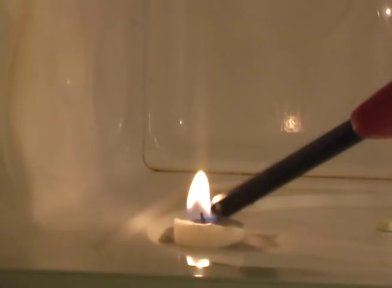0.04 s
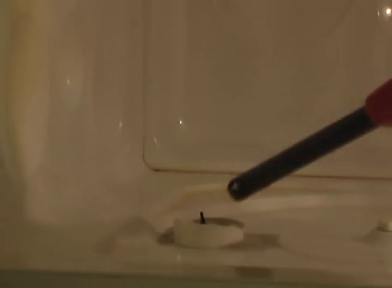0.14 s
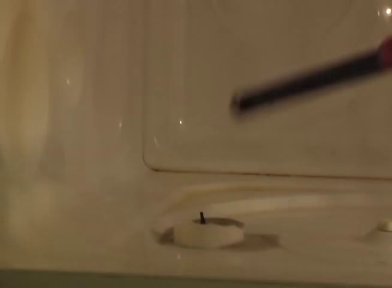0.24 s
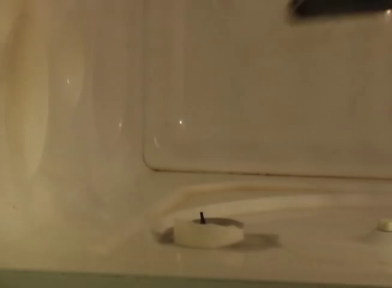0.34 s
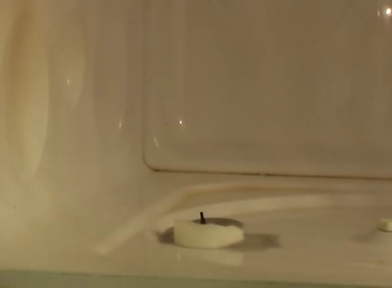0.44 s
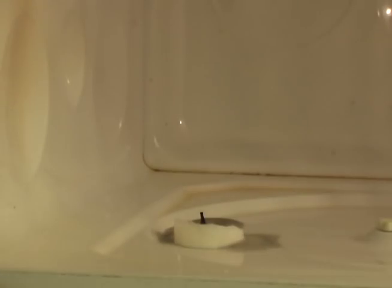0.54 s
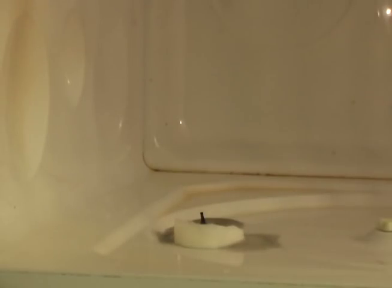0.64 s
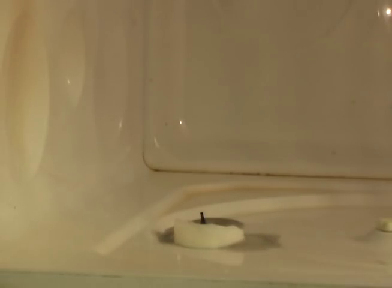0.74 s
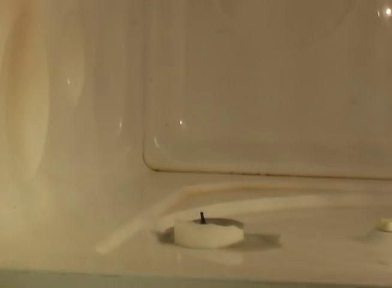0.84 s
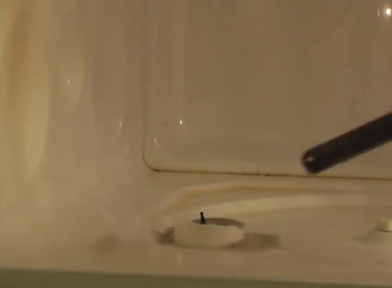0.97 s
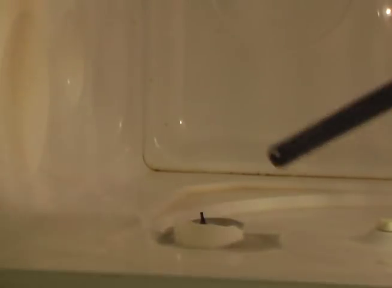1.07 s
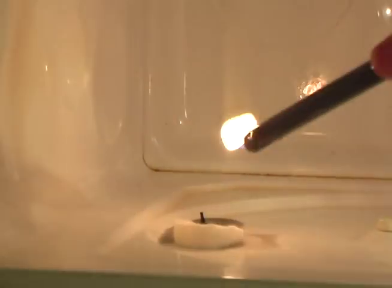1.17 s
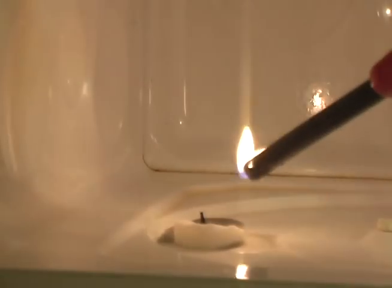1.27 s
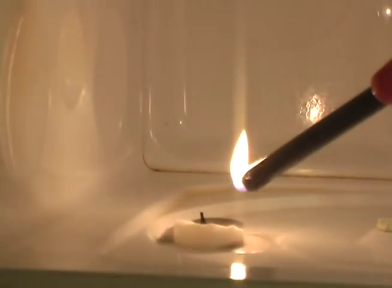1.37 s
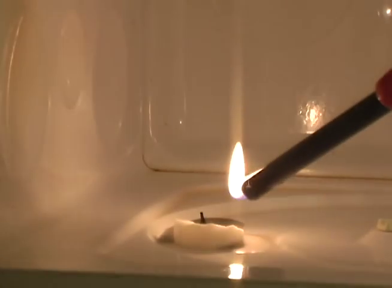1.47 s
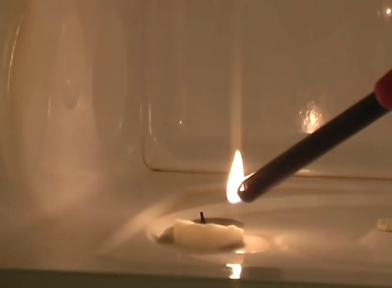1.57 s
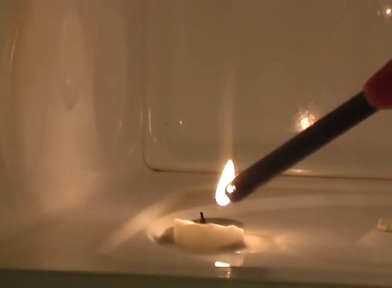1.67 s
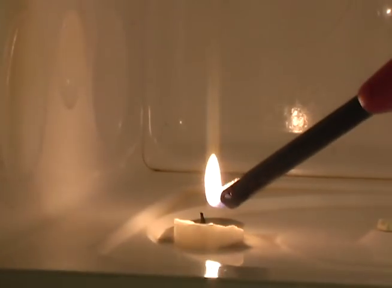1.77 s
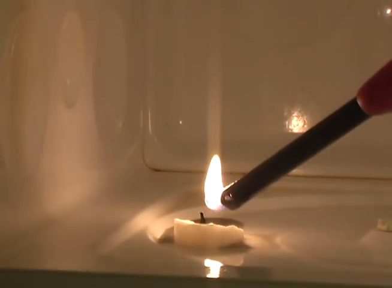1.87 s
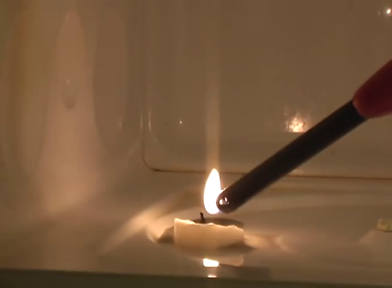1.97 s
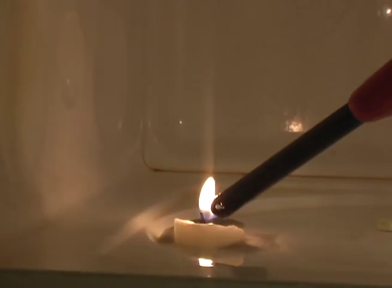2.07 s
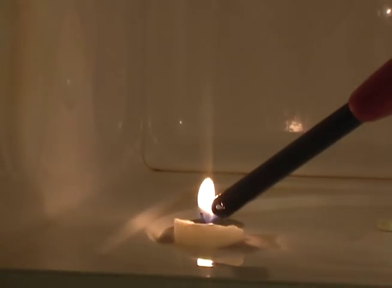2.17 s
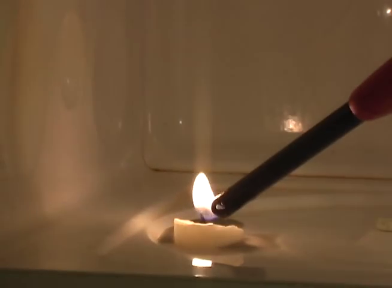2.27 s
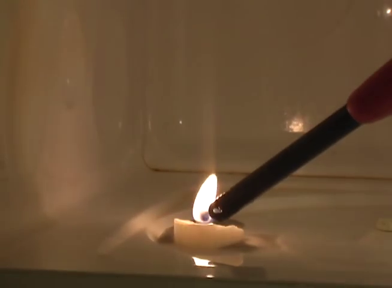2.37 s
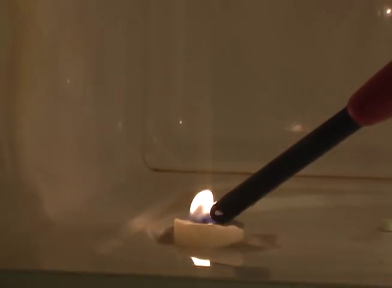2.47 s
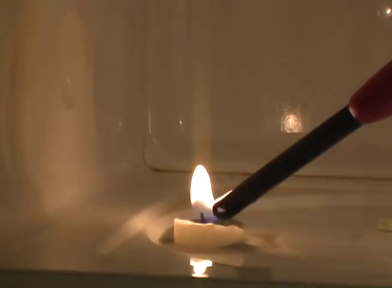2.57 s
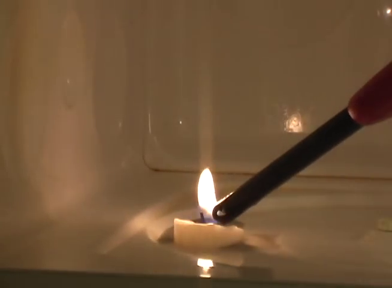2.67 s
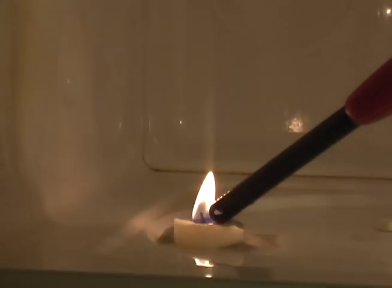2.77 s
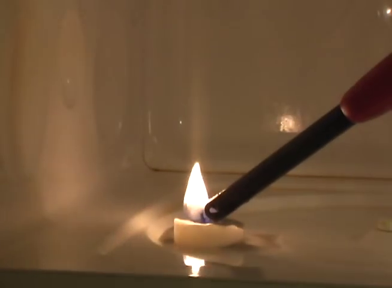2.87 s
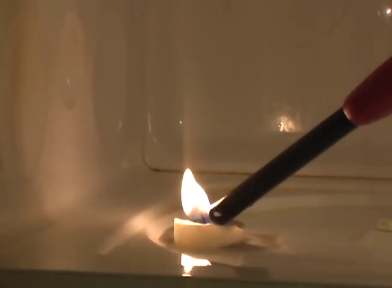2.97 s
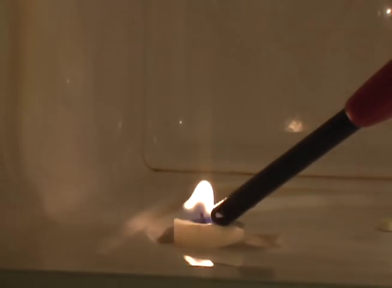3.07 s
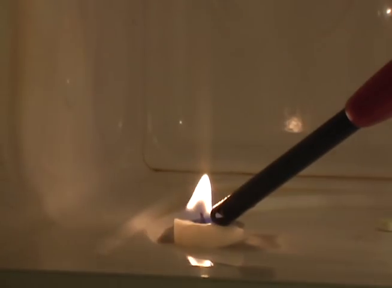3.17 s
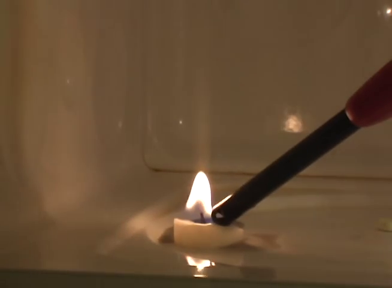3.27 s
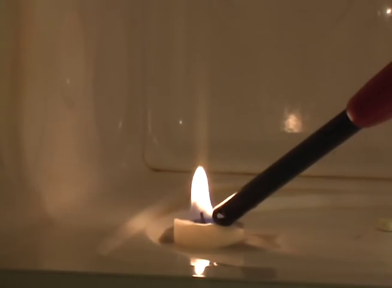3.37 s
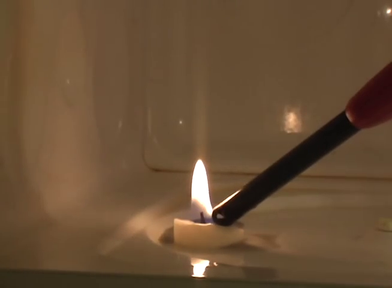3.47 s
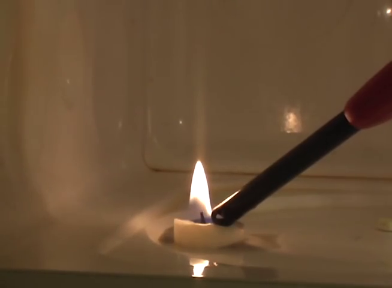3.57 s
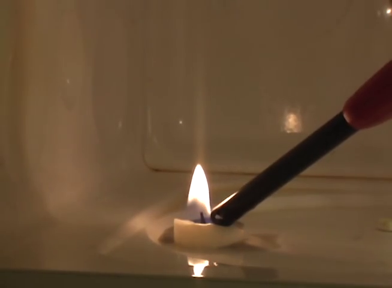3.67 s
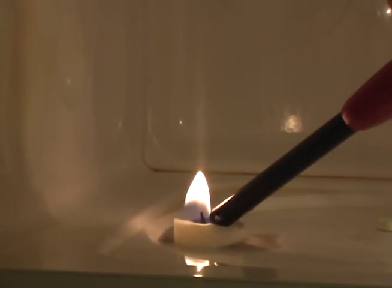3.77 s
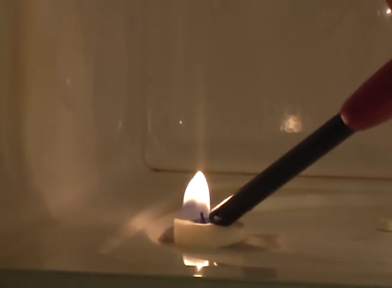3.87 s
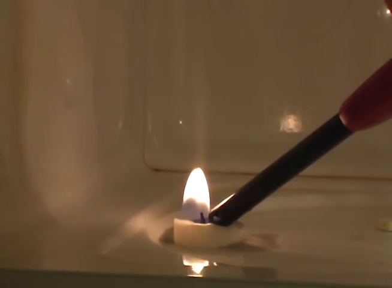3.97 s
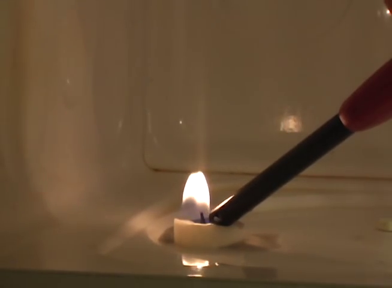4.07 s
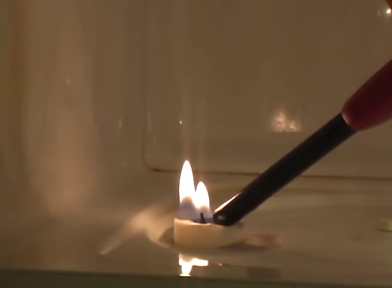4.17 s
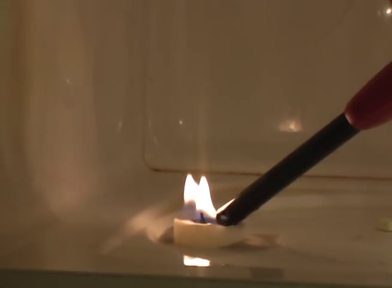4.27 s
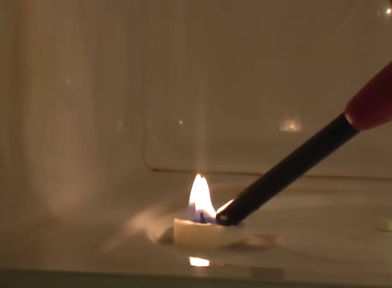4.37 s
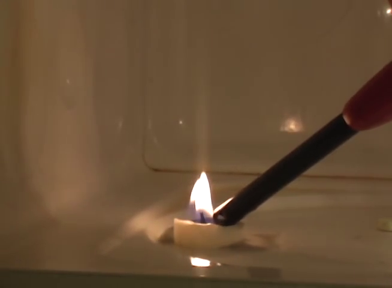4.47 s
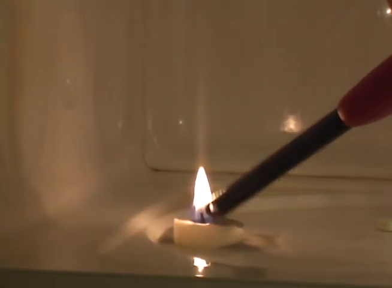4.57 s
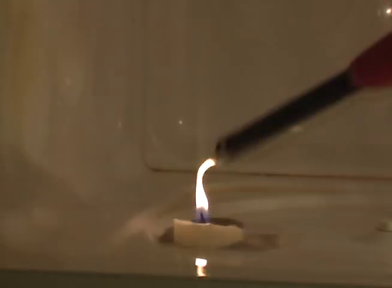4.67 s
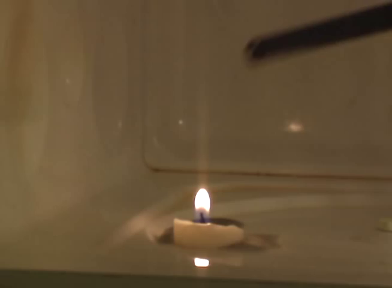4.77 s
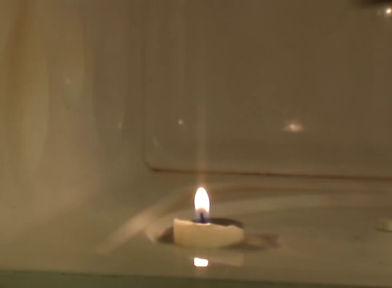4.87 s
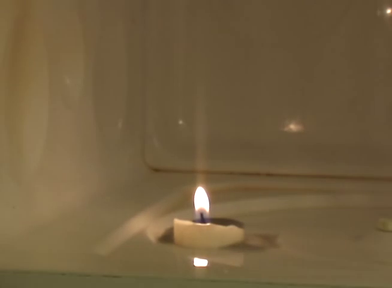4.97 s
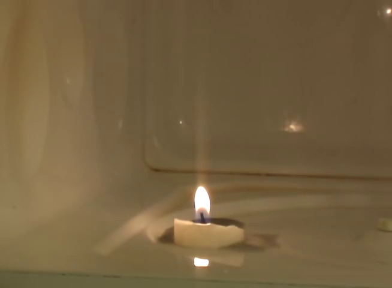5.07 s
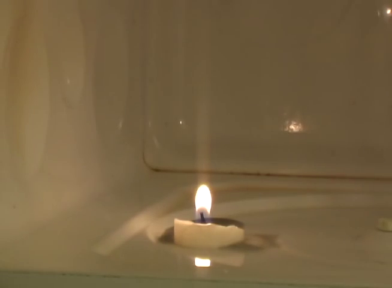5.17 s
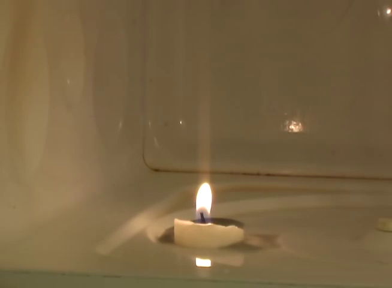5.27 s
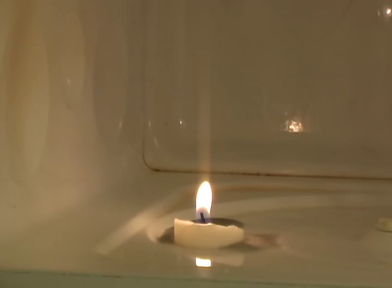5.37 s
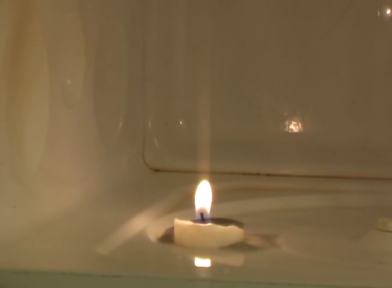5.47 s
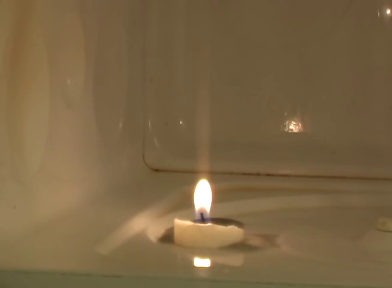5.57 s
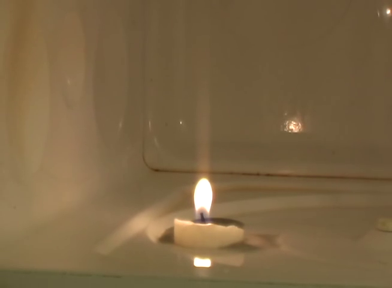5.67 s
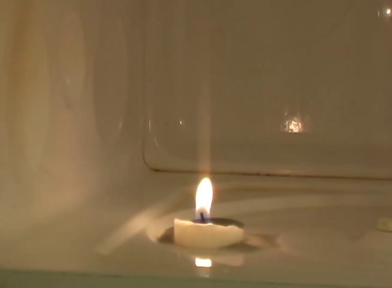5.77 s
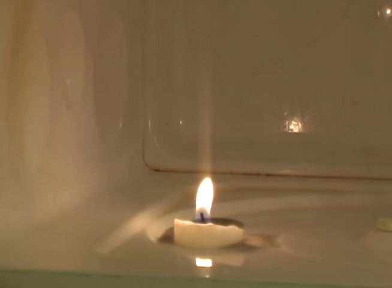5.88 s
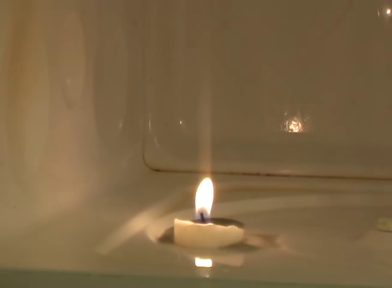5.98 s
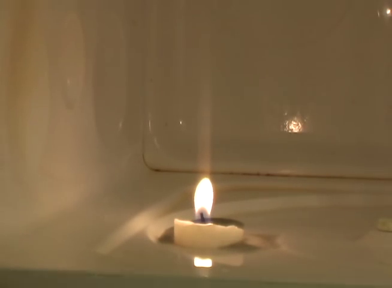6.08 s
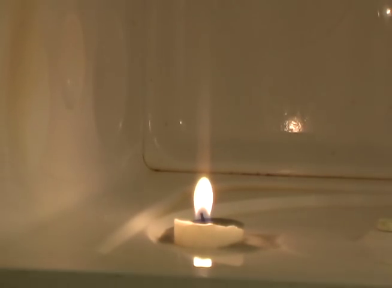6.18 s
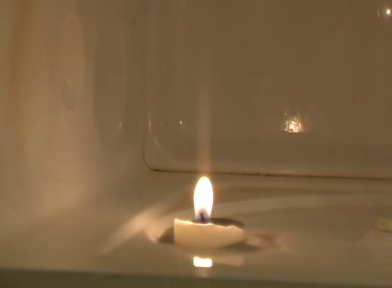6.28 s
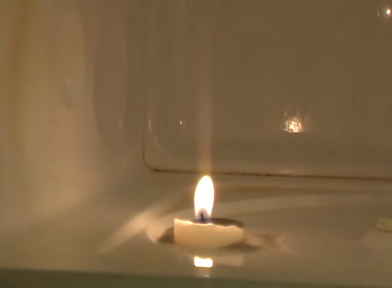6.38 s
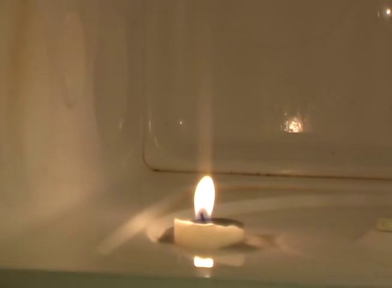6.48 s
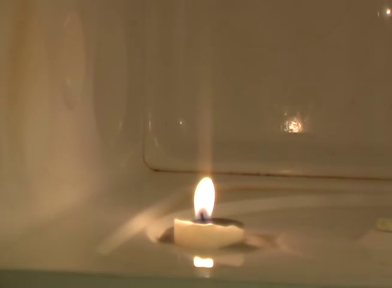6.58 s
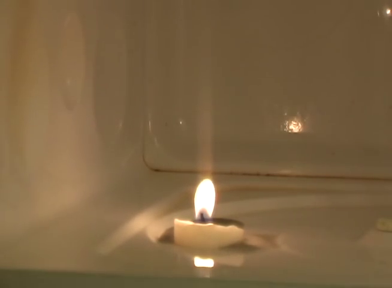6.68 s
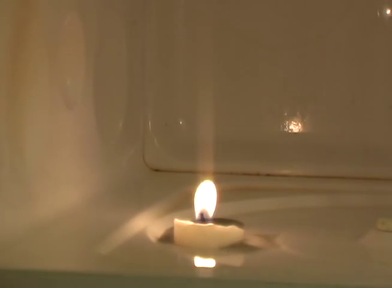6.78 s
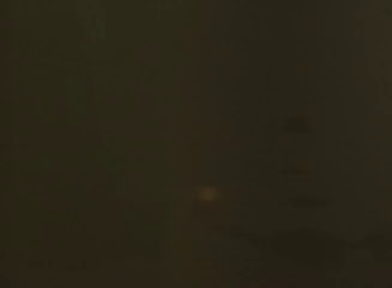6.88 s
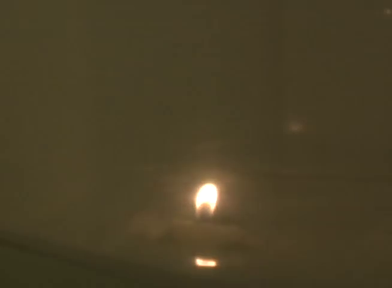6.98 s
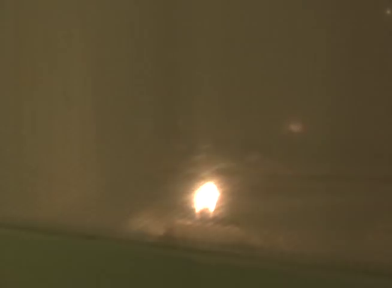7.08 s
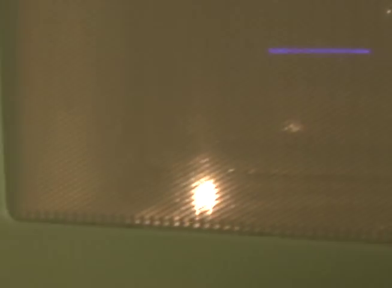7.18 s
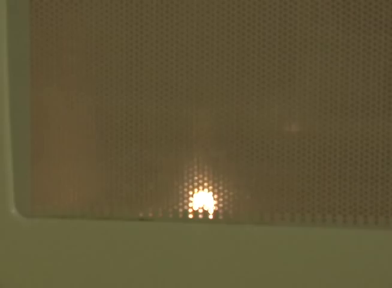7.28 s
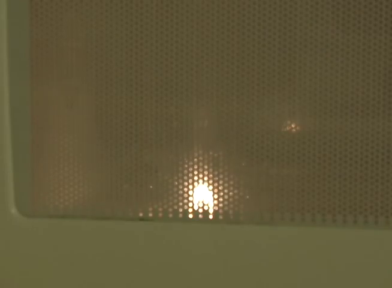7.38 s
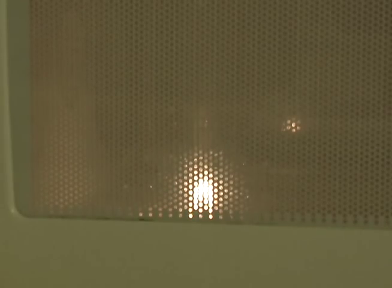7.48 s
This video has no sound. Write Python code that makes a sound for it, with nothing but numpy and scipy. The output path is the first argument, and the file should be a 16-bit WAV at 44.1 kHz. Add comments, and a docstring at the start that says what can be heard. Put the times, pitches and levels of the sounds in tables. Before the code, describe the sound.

A fan hums steadily throughout in a kitchen, a slightly wavering tone over moving air. Right at the start, the plastic trigger of a long gas lighter snaps, followed by soft sleeve rustle, a few light taps and faint creaks. At about 1.1 seconds the trigger rattles and cracks sharply, louder than before. A faint, soft whistle follows from 1.3 to 2 seconds, then only the hum remains. At about 4.6 seconds the trigger snaps again. From there until 7 seconds, hand and sleeve rustle among small knocks and dull bumps, with a firmer knock near 6.5. At 7.2 seconds a microwave door slams, the loudest sound: the latch clatters, the metal case rings and the panel shakes briefly, with a low bump at 7.5. The impacts have a short room echo. The small microphone adds faint hiss and buzz and overloads slightly on the slam.

```python
"""A kitchen, where a fan hums and a candle is lit inside an open microwave oven with a long gas lighter.
The trigger snaps on and off, cracking and rattling in its plastic body. Hand and sleeve rustle, small
things knock and creak, and a soft whistle is heard. Then the door slams: its contacts ring the
sheet-metal case and the panel shakes on. Snaps, knocks and slam echo in the oven cavity and the room.
A small camera microphone hears it, with a faint hiss and buzz of its own, gain control and overload."""
import sys
import numpy as np
from scipy import signal
from scipy.fft import rfft, irfft
from scipy.io import wavfile

SR = 44100
rng = np.random.default_rng(int(sys.argv[2]) if len(sys.argv) > 2 else 0)


def output_pcm(signal):
    """Save a mono or channel-first signal as 16-bit PCM at the path in sys.argv[1].

    Samples are clipped to [-1, 1] before scaling.
    """
    pcm = np.clip(np.atleast_2d(signal).T, -1, 1) * 32767
    wavfile.write(sys.argv[1], SR, np.round(pcm).astype(np.int16))


N = 332073
T = np.arange(N) / SR


def amp(db):
    """Decibels to gain."""
    return 10 ** (np.asarray(db) / 20)


def rms_one(x):
    """Scale to rms 1."""
    return x / np.sqrt(np.mean(x ** 2) + 1e-20)


def coloured(spectrum):
    """Noise at rms 1, shaped by an EQ curve of (Hz, dB) points."""
    hz, points = np.arange(N // 2 + 1) * SR / N + 1, np.array(spectrum)
    shape = amp(np.interp(np.log(hz), np.log(points[:, 0]), points[:, 1], -90, -90))
    return rms_one(irfft(rfft(rng.standard_normal(N)) * shape, N))


def drift(rate_hz):
    """Smooth random wander at rms 1, mostly slower than rate_hz."""
    r = np.exp(-2 * np.pi * rate_hz / SR)
    return rms_one(signal.lfilter([1], [1, -2 * r, r * r], rng.standard_normal(N + SR))[SR:])


def ring(x, hz, t60):
    """Resonator: a unit click sets off a dying sine of height 1."""
    r, w = amp(-60 / (t60 * SR)), 2 * np.pi * hz / SR
    return signal.lfilter([0, np.sin(w)], [1, -2 * r * np.cos(w), r * r], x + 1e-18)


def lift(x, hz, db, q=9.3):
    """Bell EQ: q is centre frequency over width."""
    r = np.exp(-np.pi * hz / q / SR)
    poles = [1, -2 * r * np.cos(2 * np.pi * hz / SR), r * r]
    band = signal.lfilter([(1 - r * r) / 2, 0, (r * r - 1) / 2], poles, x)
    return x + (amp(db) - 1) * band


def add(out, s, sound):
    """Mix a short sound in at s seconds."""
    i = round(s * SR)
    out[i:i + len(sound)] += sound[:N - i]


def fan():
    """The blades sing one wavering tone over a bed of hum and moving air."""
    # Blade tone. Each row: time in seconds, pitch in Hz, level in dB.
    blade_tone = [(0.0, 388, -52), (0.1, 383.4, -43.5), (4.52, 386.6, -46.5), (4.58, 383.2, -43.5),
                  (7.15, 383.5, -42)]
    # Steady hum. Each row: pitch in Hz, level in dB, signed depth of waver in dB.
    hum_tones = [(60.5, -57.5, -0.5), (231, -53.5, 1)]
    # Weaker, noisy hum. Each row: centre in Hz, width in Hz, level in dB.
    hum_bands = [(92.2, 7.3, -74), (119.3, 4.2, -63.5), (187.7, 14, -59), (223.3, 12, -58.5),
                 (568, 7.1, -71.5), (796, 30, -70.5), (1004, 12, -74.5), (1470, 37, -73.5), (2600, 25, -77),
                 (2834, 41, -73.5), (3800, 40, -78), (4680, 55, -80), (5620, 35, -78.5), (7470, 120, -78)]
    # Air through the room. Each row: frequency in Hz, relative level in dB.
    air_eq = [(20, -29), (30, 5.5), (50, -9.5), (110, -1.5), (140, -25), (170, 1.5), (250, -1),
              (305, -10.5), (340, -2), (450, -4), (500, -12), (570, -11.5), (610, -35.5), (640, -14),
              (1000, -26)]
    s, hz, db = np.transpose(blade_tone)
    phase = 2 * np.pi * np.cumsum(np.interp(T, s, hz)) / SR + 0.24 * drift(17)
    out = np.sqrt(2) * amp(np.interp(T, s, db) + .8 * drift(3.8)) * np.sin(phase)
    for hz, db, waver_db in hum_tones:
        gain = np.sqrt(2) * amp(db + waver_db * drift(3.3))
        out += gain * np.sin(2 * np.pi * hz * T + 0.092 * waver_db * drift(5))
    white = rng.standard_normal(N + SR)
    for hz, width, db in hum_bands:
        t60 = np.log(1000) / (np.pi * width)
        out += amp(db) * rms_one(ring(ring(white, hz, t60), hz, t60)[SR:])
    return out + amp(-50.5) * coloured(air_eq)


def camera_noise(buzz_hz=299.7):
    """The camera's own hiss, and a thin pulse buzz with only treble harmonics."""
    # Hiss colour. Each row: frequency in Hz, relative level in dB.
    hiss_eq = [(470, -12), (800, -1), (1180, -3.5), (1500, -5.5), (2050, -8.5), (2770, -10), (3560, -14),
               (9330, -17.5), (13600, -24), (16000, -53)]
    buzz = sum(np.sin(2 * np.pi * k * buzz_hz * T + rng.uniform(0, 1)) * amp(rng.normal(0, 1.4))
               for k in range(15, 40))
    return amp(-60.5) * coloured(hiss_eq) + amp(-75) * rms_one(buzz)


def rustle(rise_s=0.058, fall_db_per_s=220):
    """Cloth and skin rub in a dull and a bright layer of grainy noise; strokes swell, hold and die."""
    # Hand and sleeve. Each row: start in seconds, length in seconds, dull rub in dB, bright rub in dB.
    strokes = [(0, 0.065, -49.5, -64), (0.087, 1.15, -60.5, -65.5), (0.257, 0.079, -54, -58),
               (0.466, 0.2, -52, -67), (0.664, 0.6, -53.5, -66), (1.202, 0.62, -66, -75),
               (4.696, 2.2, -60, -65.5), (4.722, 0.29, -57, -62.5), (4.997, 0.36, -52.5, -58),
               (5.485, 0.32, -56, -63), (5.95, 0.066, -65.5, -65.5), (6.147, 0.25, -52, -59),
               (6.718, .08, -60, -55.5), (6.82, 0.13, -53.5, -48)]
    # Colours of the two layers. Each row: frequency in Hz, relative level in dB.
    dull_eq = [(260, -8.5), (450, -11), (559, -5), (610, -19), (679, -4.5), (1170, -13.5), (1780, -9.5),
               (6000, -18.5), (7800, -27), (13200, -120)]
    bright_eq = [(2500, -29.5), (4000, -11), (5500, -2.5), (8000, -3.5), (12000, -6), (14000, -17.5),
                 (15500, -24.5)]
    start, length, dull_db, bright_db = np.transpose(strokes)[:, :, None]
    t = T[::100]
    swell = np.clip((t - start) / rise_s, 0, 1)
    envelopes = swell * amp(-fall_db_per_s * np.maximum(t - start - length, 0))
    dull = amp(2.0 * drift(52)) * coloured(dull_eq)
    bright = amp(1.5 * drift(79.6)) * coloured(bright_eq)
    out = np.zeros(N)
    for rub, stroke_db, resting_db in (dull, dull_db, -70.5), (bright, bright_db, -78):
        power = amp(2 * resting_db) + ((amp(stroke_db) * envelopes) ** 2).sum(axis=0)
        out += np.interp(T, t, np.sqrt(power)) * rub
    return out


def lighter():
    """The trigger cracks and rattles in a damped plastic body. Returns dry snaps and their echo send."""
    # Trigger snaps. Each row: peak time in seconds, level in dB, rattle t60 in seconds, rise in seconds,
    # the snap's own ring in Hz, low-cut bypass in dB, high-cut bypass in dB.
    trigger = [(.005, -54, .024, .0012, 9370, -12, -9), (.028, -63, .04, .0022, 2400, -12, -10),
               (0.0463, -38.5, .03, 0.0011, 7600, 6, -11.5),
               (0.0686, -20.5, .03, 0.0044, 5200, -3.5, -16.5), (.9705, -60, .03, .001, 4700, 4, -13),
               (1.004, -36, 0.047, 0.0011, 2600, -30, -11),
               (1.014, -36.5, 0.091, 0.00089, 1600, -12.5, -10.5),
               (1.028, -47, .029, 0.0018, 3700, -16.5, -11.5), (1.075, -8.5, .007, 0.0019, 6200, -16, 5),
               (4.503, -52.5, 0.024, .001, 3300, -15, -9), (4.537, -54.5, .04, 0.0016, 2500, -6, -11),
               (4.548, -51, 0.12, .0013, 2500, -7, -4), (4.5787, -25.5, 0.027, 0.001, 3300, 0.5, -11.5),
               (4.6024, -16, 0.015, 0.0043, 7600, -6, -6.5)]
    # Resonances of the body. Each row: centre in Hz, lift in dB.
    body_peaks = [(650, 7), (1050, 10), (2600, 7), (3500, -0.5), (5300, 1), (7600, 0.5), (10400, 9),
                  (13000, 1)]
    snaps, send, age = np.zeros(N), np.zeros(N), T[:SR // 4]
    low_cut, high_cut = signal.butter(2, 2300, "high", fs=SR), signal.butter(2, 9000, fs=SR)
    for s, db, t60, rise, ring_hz, low_db, top_db in trigger:
        decay = amp(-60 * np.maximum(age - rise, 0) / t60)
        crack = 1 + 2.67 * np.exp(-np.abs(age - rise) / 0.00082)
        envelope = np.minimum(age / rise, 1) ** 2 * decay * crack
        # A noise burst and a clean click share the EQ; the click gives the echo an even colour.
        pair = np.array([envelope * rng.standard_normal(len(age)), age == 0]) + 1e-18
        pair = signal.lfilter(*low_cut, pair) + amp(low_db) * pair
        pair = signal.lfilter(*high_cut, pair) + amp(top_db) * pair
        for hz, lift_db in body_peaks + [(ring_hz, 8)]:
            pair = lift(pair, hz, lift_db)
        burst, click = pair
        snap = amp(db) * rms_one(burst) * np.sqrt(np.mean(envelope ** 2))
        add(snaps, s - rise, snap)
        add(send, s, rms_one(click) * snap.std())
    return snaps, send


def bumps(rise_s=0.014):
    """Dull bumps: low, dying sines with a soft attack."""
    # Each row: start in seconds, level in dB, pitch in Hz, t60 in seconds.
    hits = [(.11, -41.5, 108, 0.23), (4.643, -29, 113, 0.082), (5.671, -31, 98, 0.11),
            (6.516, -35, 118, 0.16), (6.529, -46, 330, 0.063), (7.5, -24, 119, 0.27)]
    out, age = np.zeros(N), T[:SR // 4]
    for s, db, hz, t60 in hits:
        envelope = amp(db - 60 * age / t60) * np.minimum(age / rise_s, 1)
        add(out, s, envelope * np.sin(2 * np.pi * hz * age))
    return out


def knocks():
    """Small contacts of hand and door: a noise burst rings three short modes under a bright tick."""
    # Each row: time in seconds, peak of the ring in dB, pitch in Hz, peak of the tick in dB.
    hits = [(.371, -44, 2540, -38.5), (.383, -31, 560, -59), (4.767, -30.5, 744, -58),
            (4.835, -37.5, 990, -57), (4.943, -28, 770, -60.5), (4.98, -32.5, 860, -42),
            (5.032, -37, 900, -57), (5.09, -39.5, 1500, -54), (5.121, -32.5, 870, -53),
            (5.638, -34.5, 2140, -31.5), (5.69, -41, 530, -55), (5.772, -39, 2300, -56),
            (5.99, -43.5, 880, -55), (6.034, -52, 900, -46.5), (6.509, -28.5, 1140, -38.5),
            (6.524, -25, 580, -29.5), (6.542, -27, 834, -44), (6.803, -29.5, 3380, -50),
            (6.816, -40.5, 1920, -37.5), (7.499, -26.5, 3320, -45)]
    out, age = np.zeros(N), T[:SR // 4]
    tick_band = signal.butter(3, [4000, 10000], "band", fs=SR, output="sos")
    for s, db, hz, tick_db in hits:
        t60 = 0.056 * amp(.55 * (tick_db - db))   # brighter contacts last longer
        burst = rng.standard_normal(len(age)) * amp(-60 * age / t60)
        burst[0] = 4.0   # the first contact is the hardest
        body = ring(burst, hz, 8.5 / hz) + .5 * ring(burst, 1.43 * hz, 2.4 / hz)
        body += 0.21 * ring(burst, 2.44 * hz, 6.5 / hz)
        tick = signal.sosfilt(tick_band, burst)
        knock = amp(db) * body / np.abs(body).max() + amp(tick_db) * tick / np.abs(tick).max()
        add(out, s - .001, knock)
    return out


def creaks_and_whistle():
    """Short creaks and squeaks, and one long soft whistle near 740 Hz: uneven pulses into a resonance."""
    # Each row: start and end in seconds, pulses per second, resonance in Hz, width in Hz, level in dB.
    tones = [(0.471, 0.614, 396, 1350, 59, -47), (0.601, 0.668, 300, 2030, 80, -54.5),
             (0.715, 0.842, 95, 1930, 350, -50.5), (0.846, 0.91, 240, 1740, 100, -55),
             (1.344, 2.012, 910, 736, 90, -56.5), (5.172, 5.212, 200, 1970, 150, -52)]
    out = np.zeros(N)
    for start, end, per_s, hz, width, db in tones:
        size = round((end - start) * SR)
        pulse_count = np.cumsum(per_s * (1 + 0.26 * drift(40)[:size])) / SR
        pulses = np.diff(np.floor(pulse_count), prepend=0) * amp(rng.normal(0, 1.9, size))
        tone = rms_one(ring(pulses, hz, t60=np.log(1000) / (np.pi * width)))
        add(out, start, amp(db) * np.hanning(size) ** .5 * tone)
    return out


def door():
    """Each contact clatters and rings the case. Returns the slam and the shake that follows it."""
    # Contacts, latch first. Each row: time in seconds, clatter in dB, its t60 in seconds, push in dB.
    contacts = [(7.216, -3.5, 0.043, -21), (7.2213, -21, 0.026, -21.5), (7.2339, 5.5, 0.027, -4.5),
                (7.236, 10, 0.025, -11.5)]
    # Clatter colour. Each row: frequency in Hz, relative level in dB.
    clatter_eq = [(120, -32), (200, -10.5), (437, -3), (1190, -13), (1650, -3), (2210, -13), (5800, -13),
                  (12900, -25), (15500, -50)]
    # Modes of door and sheet-metal case. Each row: pitch in Hz, gain on the push in dB, t60 in seconds.
    case_modes = [(76.4, -20, .25), (90, -6.5, 0.39), (178.5, -19, 0.21), (204, -15, 0.38),
                  (277.3, -5, 0.3), (342.2, -16, 0.39), (419, 7, 0.073), (482, 2.5, 0.079), (702, -2, 0.15),
                  (770, 0.5, 0.07), (972, -3.5, 0.081), (1500, -23, 0.055), (1717, -1.5, 0.1),
                  (1940, -18, 0.05), (2250, -9, 0.067), (2684, -13, 0.38), (2614, 2.5, .025)]
    envelope = np.zeros(N)
    for s, db, t60, _ in contacts:
        age = np.maximum(T - s, 0)
        envelope += (1 - np.exp(-age / 0.001)) * amp(db - 60 * age / t60)
    slam = envelope * coloured(clatter_eq)
    times, _, _, push_db = np.transpose(contacts)
    at = [round(s * SR) for s in times]
    for hz, db, t60 in case_modes:
        push = np.zeros(N)
        push[at] = amp(push_db + db + rng.normal(0, 2.0, len(at)))
        slam += ring(push, hz, t60)
    low_cut = signal.butter(2, 80, "high", fs=SR, output="sos")
    return signal.sosfilt(low_cut, slam), panel_shake(start_s=times[2])   # from the hardest push


def panel_shake(start_s, settle_s=7.37, panel_hz=119.2):
    """The door panel hums and rattles in its frame, fading slowly, then fast, to a faint steady level."""
    # Rattle colour. Each row: frequency in Hz, relative level in dB.
    rattle_eq = [(88, -32), (150, -1), (238, -16), (278, 0), (601, -13), (790, -4.5), (1190, -12.5),
                 (1600, -12.5), (9000, -33), (11700, -45), (19800, -120)]
    sag_db = 56 * np.maximum(T - start_s, 0)
    settling = np.maximum(T - settle_s, 0)
    hum_gain = amp(-6 - sag_db - 300 * settling) + amp(-41)
    rattle_gain = amp(-7.5 - sag_db - 176 * settling) + amp(-37.5)
    swing = np.sin(2 * np.pi * panel_hz * T)
    # The rattle is loudest at one end of each swing.
    rattle = (1 + 0.12 * swing) * amp(2.0 * drift(44)) * coloured(rattle_eq)
    attack = np.clip((T - start_s) / 0.0089, 0, 1)
    return attack * (np.sqrt(2) * hum_gain * swing + rattle_gain * rattle)


def kitchen_echo(send):
    """Dense reflections die band by band: quickly in the oven cavity, slowly in the room."""
    # Each row: octave centre in Hz, room t60 in seconds and level in dB, then the same for the cavity.
    octaves = [(180, .6, -13.5, .15, -21), (360, 0.65, -20, 0.05, -16.5), (796, 0.5, -24.5, 0.037, -12.5),
               (1360, 0.39, -21.5, 0.19, -18), (2760, 0.39, -26, 0.073, -12),
               (5600, 0.33, -18.5, 0.028, -6.5), (11010, 0.28, -20, 0.037, -7)]
    age, tail = T[:SR // 2], 0
    for hz, room_t60, room_db, cavity_t60, cavity_db in octaves:
        band = signal.butter(2, [hz / np.sqrt(2), hz * np.sqrt(2)], "band", fs=SR, output="sos")
        decay = amp(room_db - 60 * age / room_t60) + amp(cavity_db - 60 * age / cavity_t60)
        tail = tail + decay * signal.sosfilt(band, rng.standard_normal(len(age)))
    return signal.fftconvolve(send, tail * np.minimum(age / 0.0015, 1))[:N]


def scene():
    """Mono mix; only the impacts are sent to the echo."""
    snaps, snap_send = lighter()
    slam, shake = door()
    taps = bumps() + knocks()
    echoes = kitchen_echo(amp(-12) * snap_send + amp(-13.5) * taps + amp(-15) * slam)
    action = snaps + taps + slam + shake + echoes + creaks_and_whistle() + rustle()
    return (action + fan() + camera_noise())[None]


def record(dry):
    """The microphone lacks deep bass; gain control ducks after peaks; the input clips; the top is cut."""
    threshold_db, attack_s, ceiling, cutoff_hz = -14, 0.0049, .7, 16300
    dry = signal.sosfilt(signal.butter(2, 55, "high", fs=SR, output="sos"), dry)
    over_db = np.maximum(20 * np.log10(np.abs(dry) + 1e-9) - threshold_db, 0)
    release = 110 * T   # a held peak falls 110 dB a second
    held_db = np.maximum.accumulate(over_db + release, axis=1) - release
    r = np.exp(-1 / (attack_s * SR))
    ducked = dry * amp(-.6 * signal.lfilter([1 - r], [1, -r], held_db))
    clipped = ducked / (1 + np.abs(ducked / ceiling) ** 6) ** (1 / 6)
    return signal.sosfilt(signal.cheby2(12, 70, cutoff_hz, fs=SR, output="sos"), clipped)


dry = scene()
out = record(dry)
output_pcm(out)
```